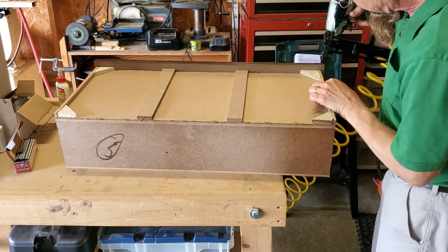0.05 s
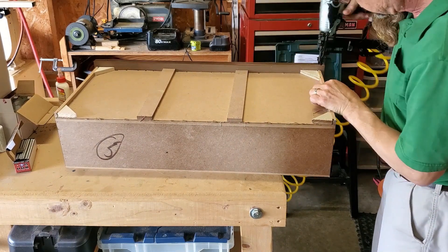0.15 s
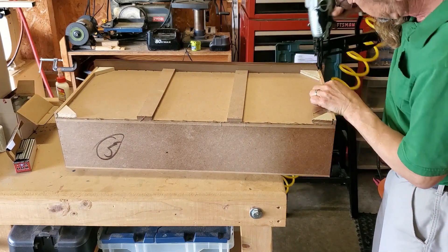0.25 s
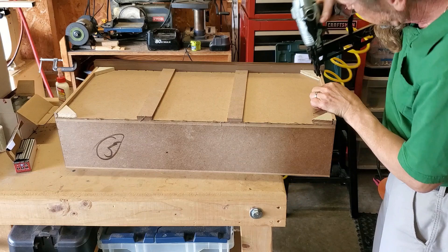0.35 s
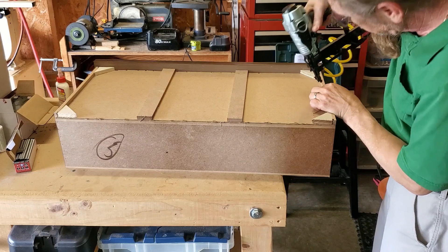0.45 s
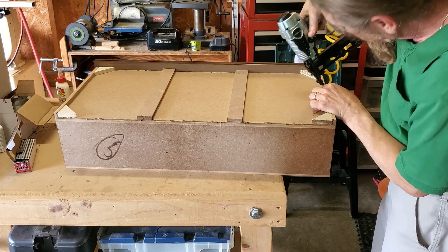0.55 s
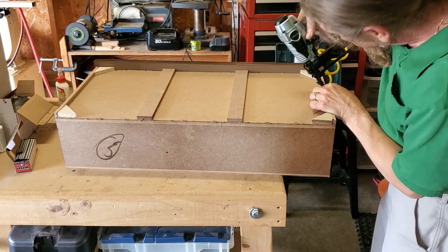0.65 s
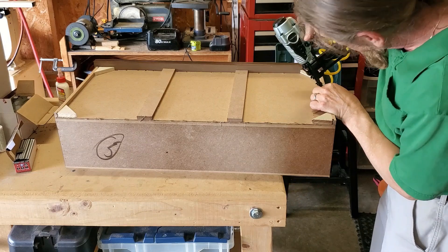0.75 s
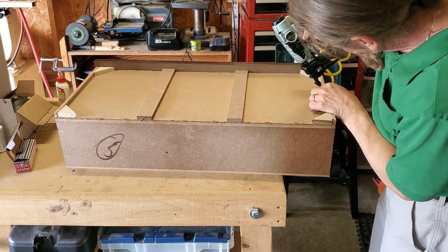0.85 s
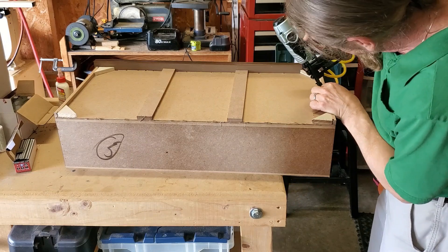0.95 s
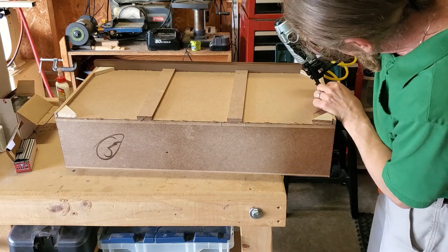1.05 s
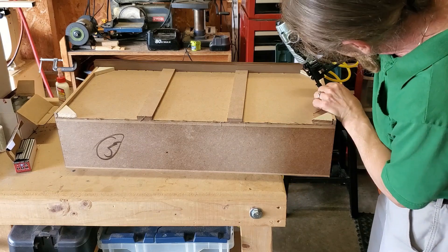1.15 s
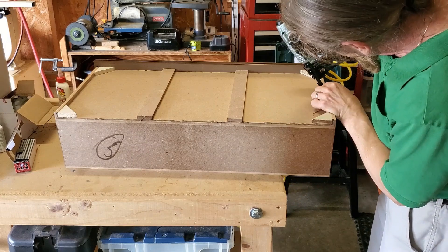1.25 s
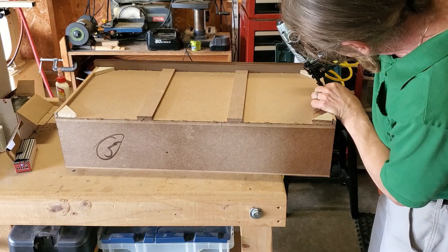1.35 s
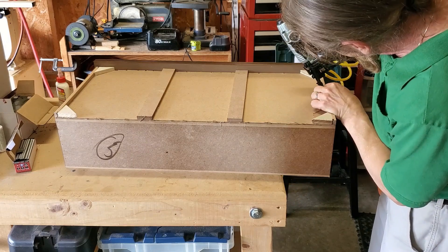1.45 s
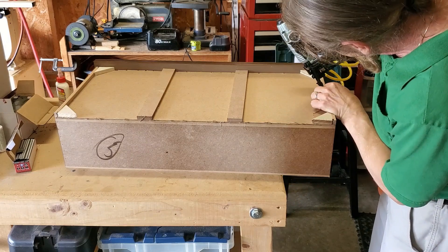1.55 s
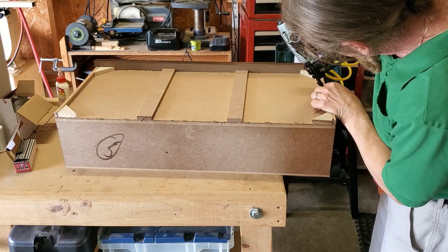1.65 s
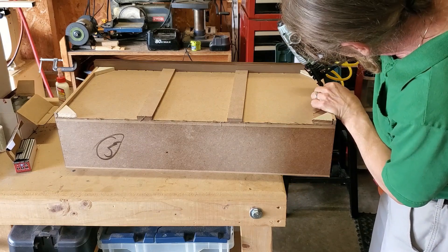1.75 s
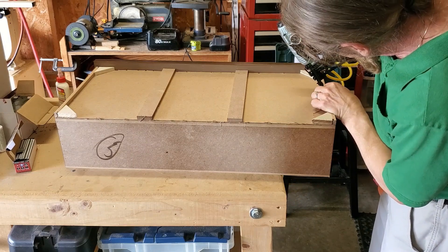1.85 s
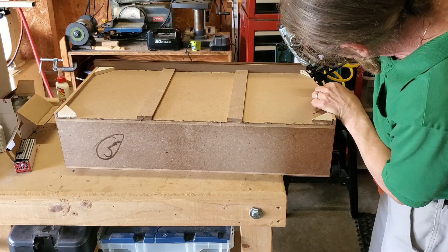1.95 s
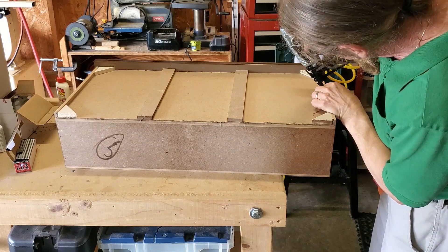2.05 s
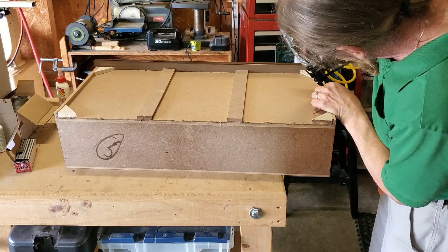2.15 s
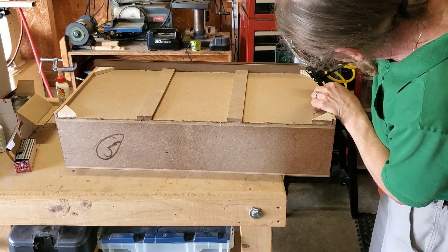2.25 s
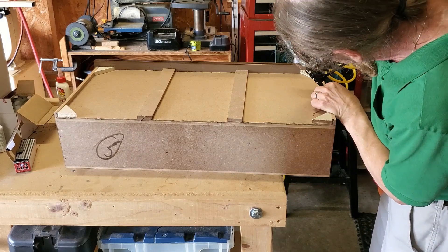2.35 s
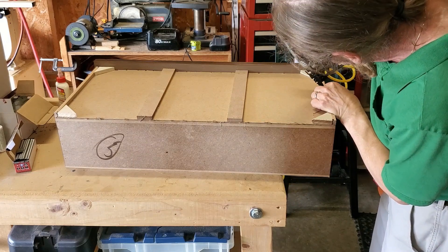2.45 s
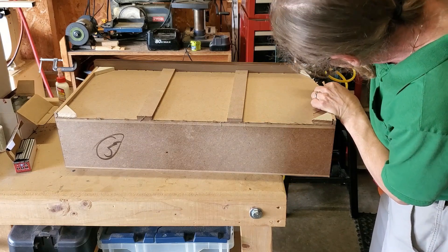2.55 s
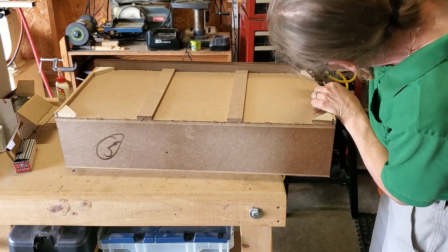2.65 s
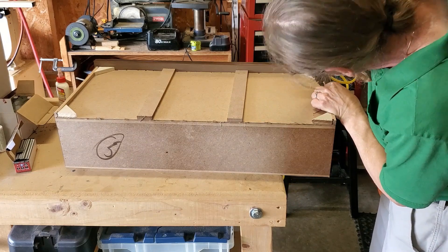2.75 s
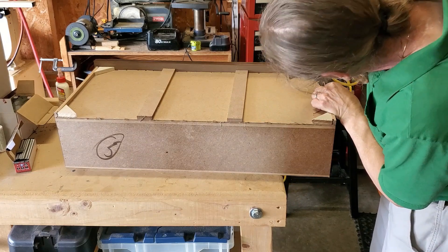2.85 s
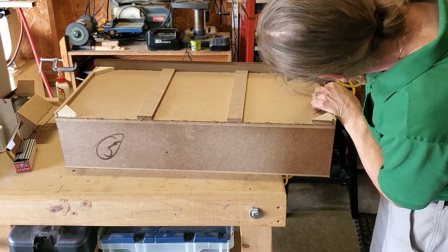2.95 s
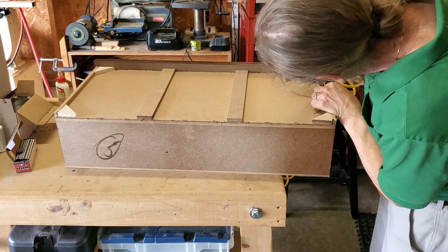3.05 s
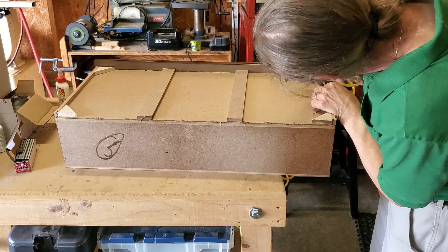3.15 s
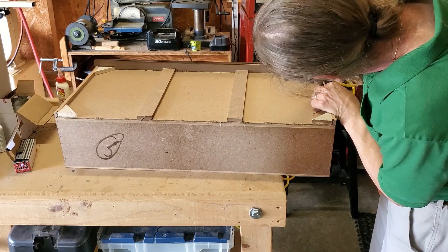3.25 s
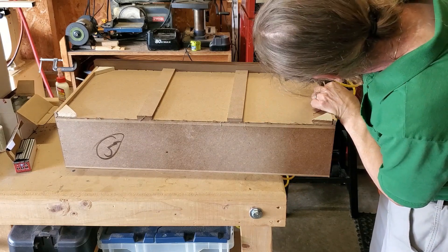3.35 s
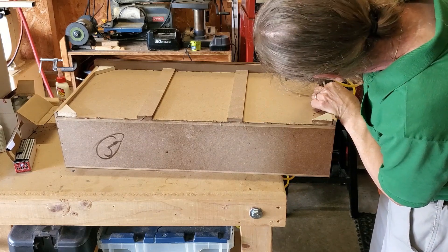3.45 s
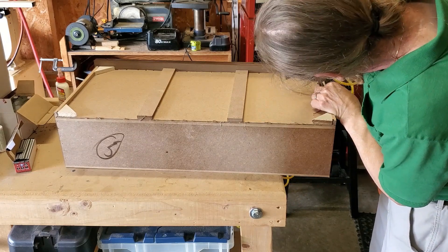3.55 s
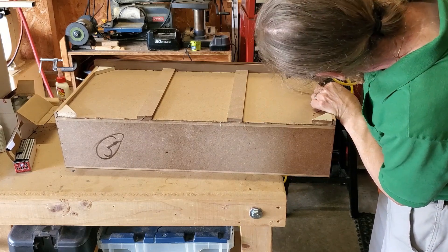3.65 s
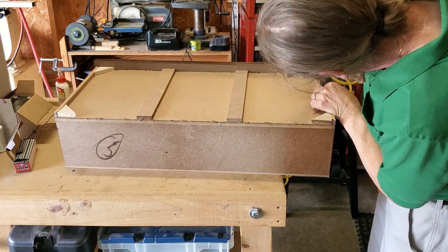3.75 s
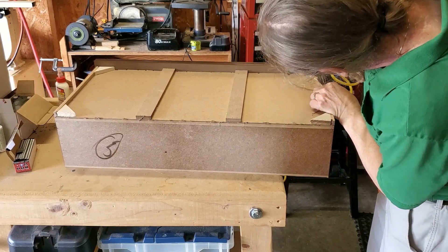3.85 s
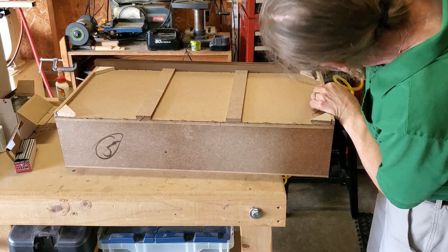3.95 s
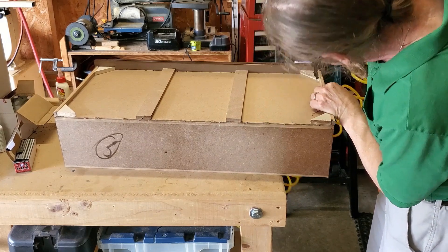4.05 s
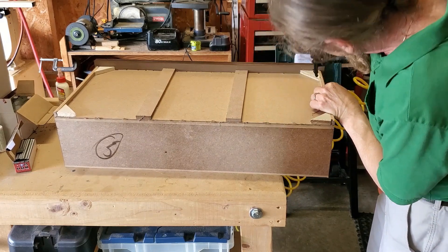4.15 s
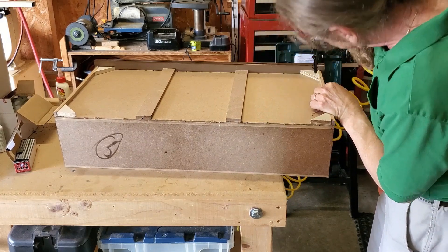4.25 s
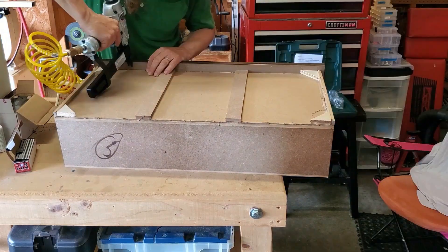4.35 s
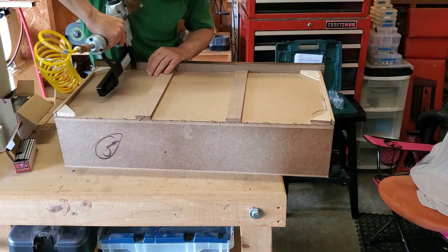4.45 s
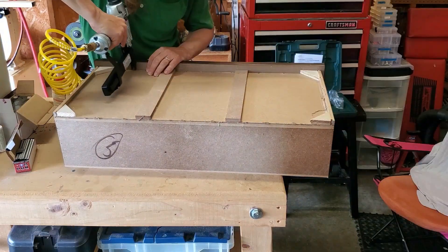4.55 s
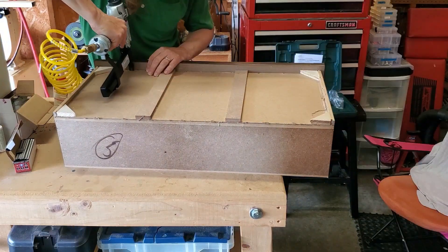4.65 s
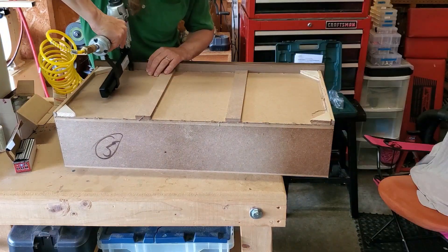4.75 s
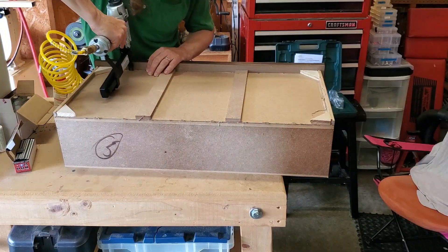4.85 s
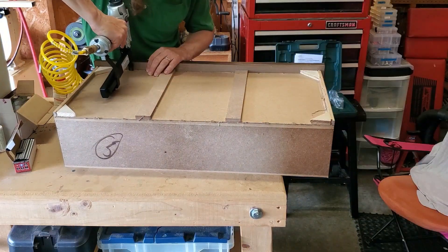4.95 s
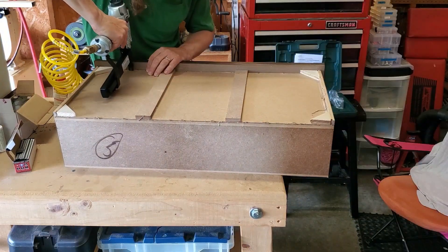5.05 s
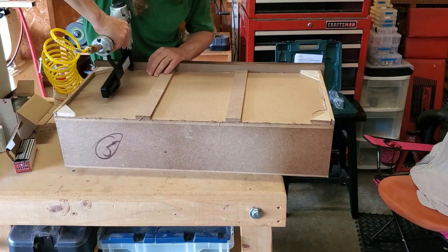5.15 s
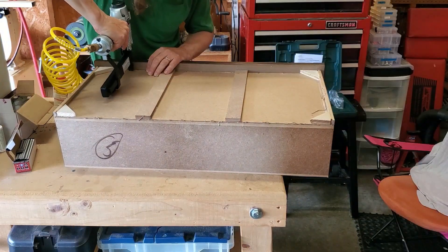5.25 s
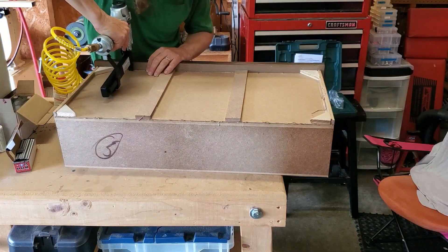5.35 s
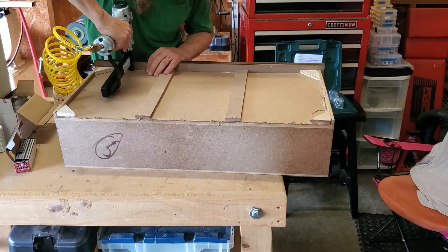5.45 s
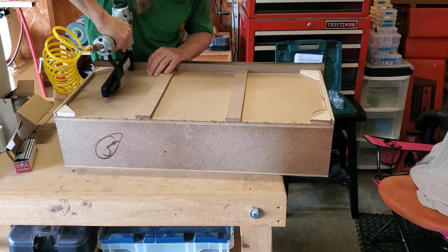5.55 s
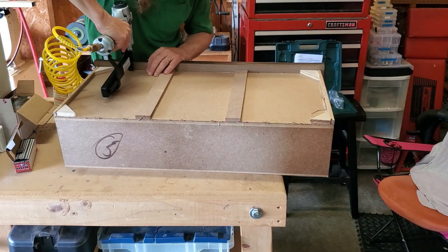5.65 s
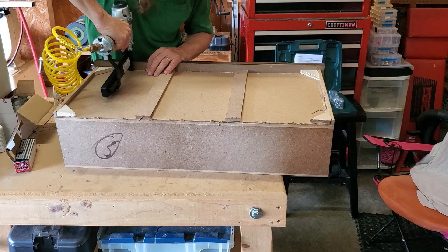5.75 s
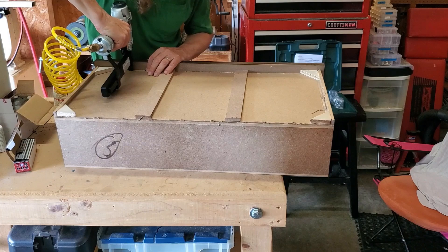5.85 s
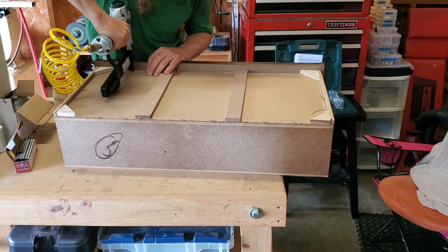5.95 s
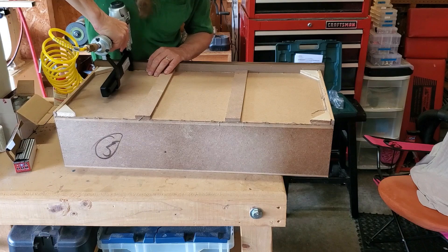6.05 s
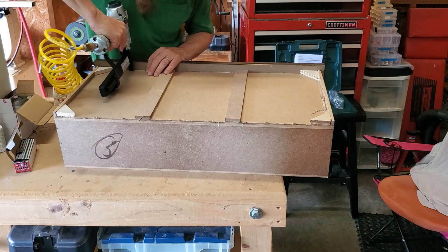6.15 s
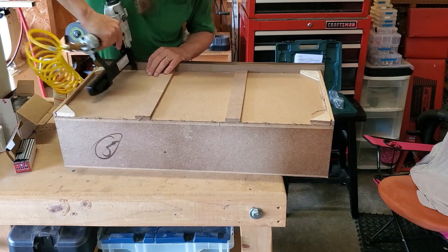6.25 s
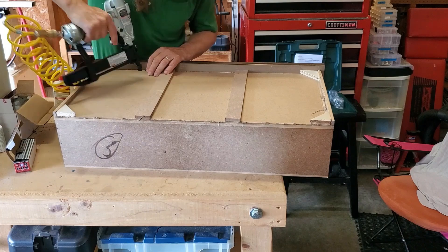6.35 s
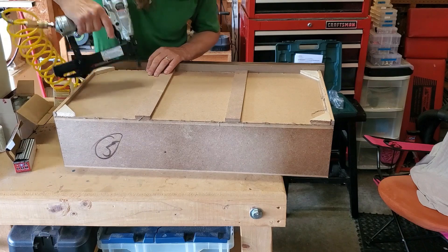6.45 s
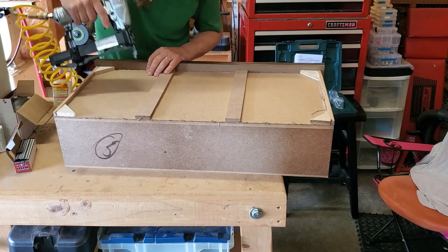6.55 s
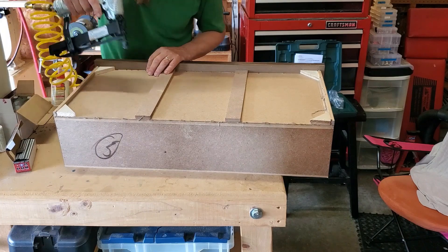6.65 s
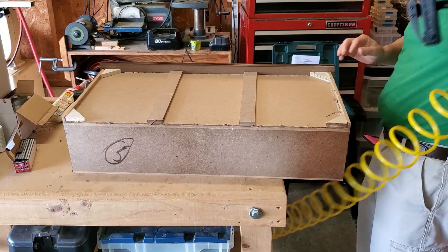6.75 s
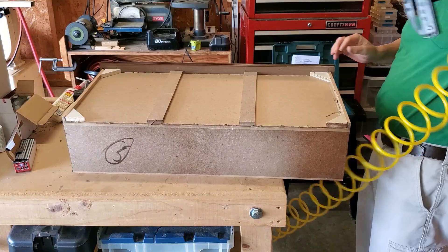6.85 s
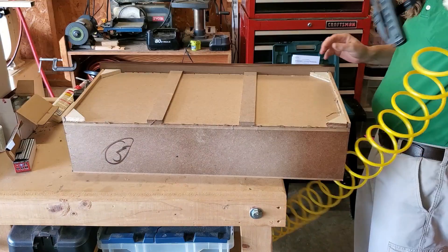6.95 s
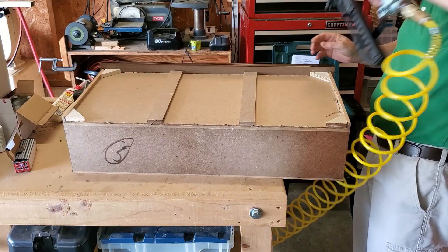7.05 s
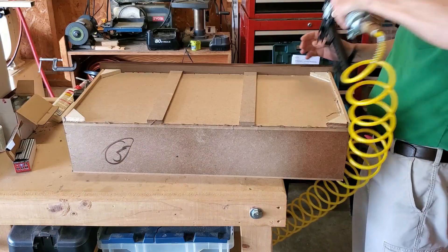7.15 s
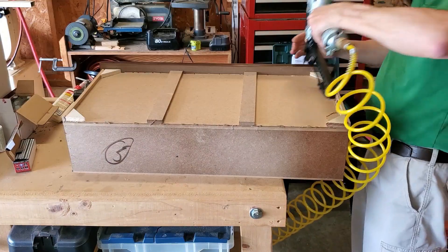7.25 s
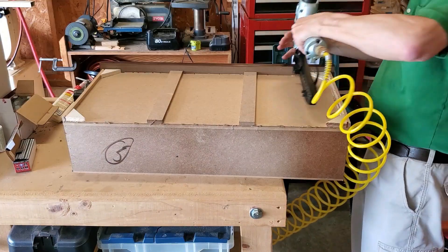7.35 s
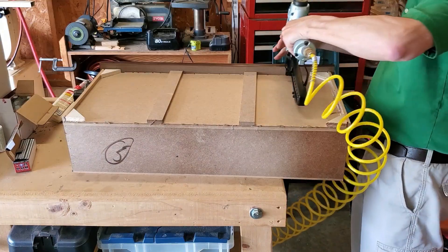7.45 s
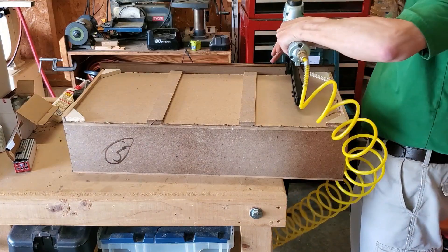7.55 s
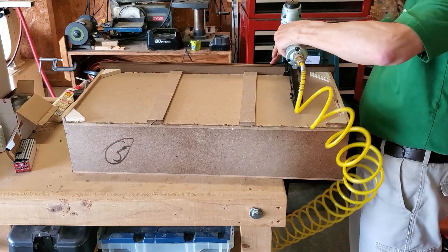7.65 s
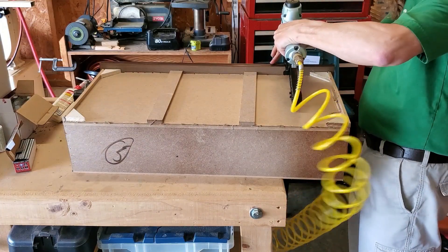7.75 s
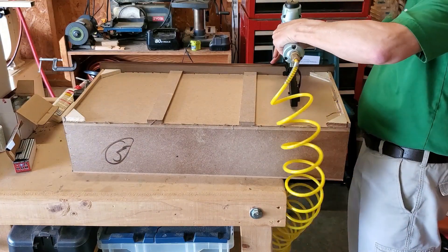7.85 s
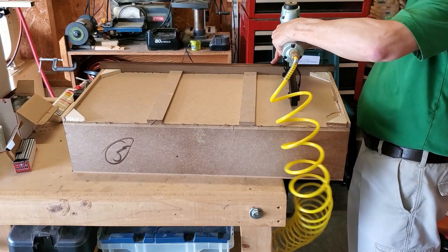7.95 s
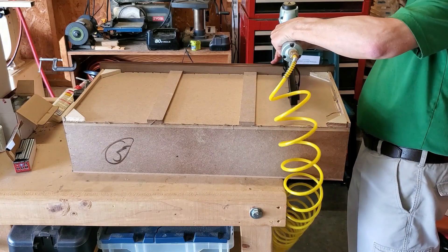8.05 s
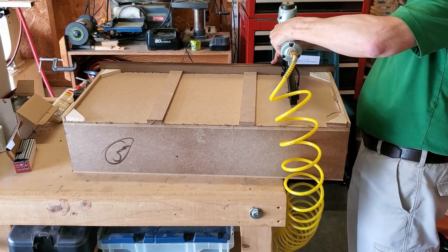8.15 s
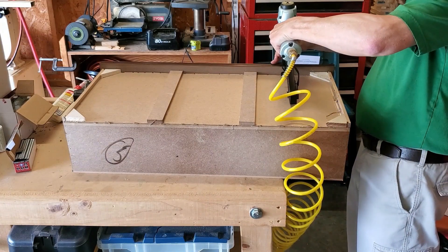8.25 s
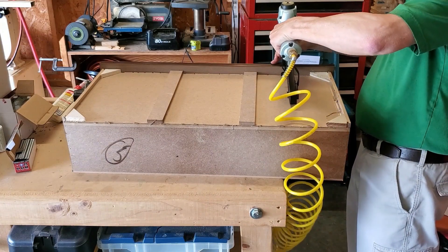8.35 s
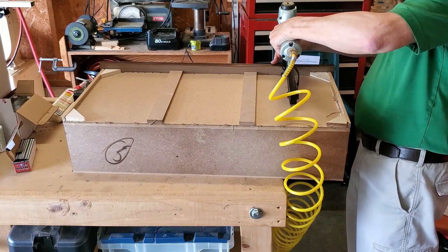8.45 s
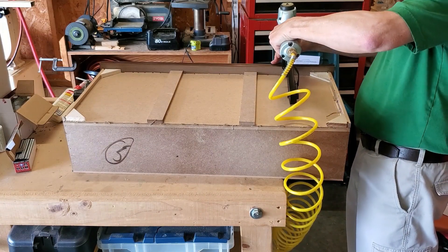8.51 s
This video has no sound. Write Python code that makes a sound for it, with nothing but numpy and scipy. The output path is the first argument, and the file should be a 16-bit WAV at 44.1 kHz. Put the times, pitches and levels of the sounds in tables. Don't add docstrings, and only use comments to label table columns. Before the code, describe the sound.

Faint handling knocks, a sharp staple-gun bang with popping air exhaust, more bumps, a second bang, then hard hollow clatter in a live workshop.

```python
import sys
import numpy as np
from scipy import signal
from scipy.fft import rfft, irfft
from scipy.io import wavfile
from scipy.ndimage import uniform_filter1d

SR = 44100
rng = np.random.default_rng(int(sys.argv[2]) if len(sys.argv) > 2 else 0)


def wav_record(signal):
    frames = np.transpose(np.atleast_2d(signal))
    bounded = np.clip(frames, -1, 1)
    quanta = np.round(bounded * 32767).astype(np.int16)
    wavfile.write(sys.argv[1], SR, quanta)


def invert_db(x):
    u = np.asarray(x, float) / 20
    return 10 ** u


N = 378378

# [t/s, kick level/dB, push width/ms, valve leak level/dB, air rush level/dB]
SHOTS = [
    (3.4717, -1, 0.09, -42.5, -9),
    (5.928, -2, 0.13, -28.5, -15.5),
]
# [f/Hz, density/dB per Hz]
RUSH_COLOURS = [
    [(35, -36), (60, -5), (124, -25.5), (229, -3.5), (264, -12.5), (546, -5), (961, -14.5), (2090, -11.5),
     (2350, -16), (14700, -26.5), (16500, -36.5)],
    [(35, -41), (60, -24.5), (108, -48.5), (173, 0.5), (573, -1.5), (1650, -0.5), (6760, -12.5),
     (7420, -20.5), (13700, -12), (15400, -16.5), (16500, -54.5)],
]
RUSH_S_PER_MS = 0.28
# [t/s, level/dB, width/ms]
SLAPS = [
    (3.4788, -6, 0.08),
    (3.4876, -3, 0.05),
    (3.4955, -7, 0.2),
    (3.6963, -12, 0.05),
    (5.9697, -6, 0.07),
    (6.1355, -8, 0.08),
]
# [t/s, port pop level/dB, hiss level/dB, hiss t60/s, piston thud level/dB]
EXHAUSTS = [
    (3.665, -8, -18, 0.34, -15),
    (6.1011, -24, -21.5, 0.28, -13.5),
]
# [f/Hz, density/dB per Hz]
AIR_COLOUR = [(180, -35), (300, -1), (361, -6.5), (793, -4), (1130, -9), (2840, -10.5), (6900, -10),
              (7760, -13.5), (15200, -9), (16500, -17)]
POP_HZ, POP_RISE_S, POP_T60_S = 2400, 0.0004, 0.0028
HISS_DELAY_S = 0.0033

# [t/s, tool clack level/dB, box thud level/dB, panel knock level/dB]
KNOCKS = [(0.3495, -67, -54, -83), (0.449, -68, -52, -74), (0.7795, -55.5, -52.5, -48),
          (1.06, -49, -47.5, -50), (2.0813, -43, -46, -77), (2.7038, -73, -53, -90),
          (4.6832, -45.5, -34.5, -60), (5.285, -40, -25.5, -41.5), (6.76, -29.5, -32, -34),
          (6.8949, -70, -43, -29.5), (6.9995, -18.5, -47, -17.5), (7.205, -50, -42, -32.5),
          (7.2635, -39.5, -33.5, -25), (7.6014, -29, -30, -26), (7.7443, -59, -34, -21.5),
          (7.9148, -22, -19, -14.5)]
# [t/s, tool clack level/dB, box thud level/dB, panel knock level/dB]
CLICKS = [(0.706, -50, -68, -88), (1.2908, -33.5, -55, -32), (1.3913, -35.5, -41, -57),
          (1.8323, -58, -42, -66), (4.3505, -47, -22, -36.5), (4.4043, -47.5, -41, -62),
          (4.5171, -36, -27.5, -39.5), (4.6171, -48.5, -55, -41.5), (5.2941, -46, -36.5, -50.5),
          (8.107, -29.5, -27, -27), (8.1354, -57, -27.5, -18), (8.302, -42.5, -46.5, -59),
          (8.3253, -69, -29, -41), (8.3606, -61, -45, -66), (8.502, -82, -33, -50)]
# [t/s, box level/dB, panel level/dB, contact length/ms]
THUDS = [(0.601, -59, -66, 9.7), (1.739, -50, -80, 8.5), (2.039, -38, -68, 8.9), (4.731, -38, -68, 5.3),
         (4.788, -26.5, -70, 1.7), (4.829, -43, -71, 9.9), (4.957, -30, -78, 2.4), (5.139, -31.5, -55, 6.9),
         (5.178, -47, -68, 11), (5.347, -33.5, -65, 2.1), (5.423, -34, -77, 2.8), (7.699, -35, -33.5, 11.4),
         (7.79, -34, -33, 8.7)]
# [f/Hz, width/Hz, level/dB]
BOX_MODES = [(138, 8.3, -8.5), (180, 75, 2.5), (235, 47, 2.5), (269, 19, -4)]
# [f/Hz, width/Hz, level/dB]
PANEL_MODES = [(383, 44, -1), (487, 16, -0.5), (556, 56, 0.5), (668, 153, 1.5), (856, 18, -4.5),
               (1080, 160, -3.5), (1313, 80, -4)]
# [f/Hz, width/Hz, level/dB]
TOOL_MODES = [(1590, 280, -4.5), (1820, 23, 10), (2098, 32, 5.5), (2975, 100, 17), (3390, 780, 10.5)]
KNOCK_TICK_DB, CLICK_TICK_DB = -22, 0
KNOCK_MS, CLICK_MS = 5.4, 3.1
KNOCK_RISE_S, CLICK_RISE_S = 0.0019, 0.00062
SOFTEN = 0.08
GRIP_DAMP = 1.9
DULL = 0.17

# [t/s, level/dB, f/Hz, t60/s]
THUMPS = [(2.075, -27, 125, 0.047), (2.7, -55.5, 180, 0.23), (4.354, -36.5, 179.3, 0.21),
          (4.683, -35, 180, 0.087), (4.79, -37, 258.6, 0.037), (5.139, -42, 249, 0.11),
          (5.287, -35, 172, 0.15), (5.42, -38.5, 208, 0.05), (7.001, -31, 174.5, 0.2),
          (7.262, -35, 188, 0.11), (7.744, -12, 250, 0.026), (7.914, -21.5, 240, 0.084),
          (8.131, -38, 231, 0.098)]
# [t/s, level/dB, f/Hz, t60/s]
BONKS = [
    (4.351, -37, 383, 0.073),
    (4.618, -43, 1470, 0.025),
    (7.003, -27, 900, 0.044),
    (7.002, -29, 1500, 0.045),
    (7.918, -27.5, 1800, 0.036),
    (8.302, -42.5, 4900, 0.037),
    (7.745, -26.5, 560, 0.031),
    (7.916, -15, 670, 0.031),
    (8.133, -25, 593, 0.074),
    (8.324, -32.5, 565, 0.02),
]

# [t/s, rumble level/dB]
LEAN = [
    [(0.3, -70.5), (1.14, -58.5), (1.95, -61.5), (2.23, -59.5), (3.07, -63.5), (3.46, -64)],
    [(4.345, -81), (4.553, -45), (4.927, -59.5), (5.415, -60), (5.589, -65.5), (5.91, -64.5)],
    [(6.75, -54.5), (6.958, -48), (7.514, -50), (7.778, -61), (8.33, -69), (8.58, -49)],
]
LEAN_RUB_DB = -9
# [peak t/s, level/dB, swell/s]
JOLTS = [(1.07, -61, 0.15), (1.29, -48.5, 0.047), (2.088, -34.5, .15), (2.69, -56, 0.082),
         (3.22, -55.5, 0.24), (3.459, -47.5, .2), (4.36, -38.5, 0.034), (4.72, -42.5, 0.17),
         (5.325, -40, 0.67), (5.55, -59.5, 0.61), (5.901, -60, 0.35), (6.86, -77, 0.13), (7.12, -47, 0.25),
         (7.74, -40, 0.36), (8.136, -40.5, 0.34), (8.33, -45, 0.69)]
# [peak t/s, rub level/dB, scrape level/dB, swell/s]
SLIDES = [(.42, -58, -95, 0.22), (.63, -59, -84, 0.5), (1.284, -50, -80, 0.034), (1.88, -60, -88, 0.73),
          (2.041, -43.5, -90, 0.2), (3.442, -68.5, -87.5, 0.46), (4.349, -47, -62, 0.0067),
          (5.16, -63, -86, 0.47), (5.24, -45.5, -84, 0.29), (6.752, -49.5, -37, 0.015),
          (7.59, -44.5, -57, 0.15), (7.69, -61, -38.5, 0.07), (7.866, -24, -24.5, 0.15)]
JOLT_T60_S, SLIDE_T60_S, SCRAPE_T60_S = 0.31, 0.15, 0.049
SETTLE_DB, SETTLE_RISE_S, SETTLE_T60_S = -10, 0.017, 0.21
WORK_HISS_DB, WORK_HISS_MID_DB = -89.5, -78.5

# [blow level/dB, piston return level/dB]
SHUDDERS = [
    (-37, -45),
    (-47, -37),
]
SHUDDER_T60_S = 0.57

# [f/Hz, t60/s, level/dB, left-right likeness 0-1]
ROOM_BANDS = [(64.8, 0.83, -1, 0.95), (121, 0.32, -3, 1), (250, .4, 1, 0.96), (500, .4, 1, 0.62),
              (887, 0.41, 0.5, 0.23), (1710, 0.37, 5.5, 0.17), (4155, 0.34, 4, 0.06),
              (7143, 0.26, 2.5, 0.36), (14100, 0.2, 0, 0.05)]
ROOM_DB, FIRST_WALL_S, BUILD_S = 2, 0.0016, 0.0054
# [start t/s, end t/s, left lag behind
PLACES = [
    (0, 4.345, 3),
    (4.345, 6.75, -5),
    (6.75, 9, 2),
]
PAN_DB, PAN_FROM_HZ = 2.5, 890
# [f/Hz, density/dB per Hz]
HUSH_COLOUR = [(18, -48.5), (30, -7), (66, -4.5), (179, -21.5), (295, -24), (569, -27), (632, -29),
               (702, -28), (1320, -34.5), (2290, -31.5), (16000, -43)]
HUSH_DB = -76.5
MIC_LIFT_DB, MIC_LIFT_HZ = -1.5, 12200
TOP_HZ = 15800


def shots():
    kicks, body = np.zeros(N), np.zeros(N)
    air = hiss(AIR_COLOUR)
    for (s, kick_db, width_ms, leak_db, rush_db), colour in zip(SHOTS, RUSH_COLOURS):
        blow = kick(s, width_ms)
        crack = air * fade(s - 0.0003, 0.0003, 0.019)
        kicks += invert_db(kick_db) * (blow + invert_db(-11.5) * crack)
        body += invert_db(-11.5) * ring(blow, BOX_MODES + PANEL_MODES, -29.0)
        length = RUSH_S_PER_MS * width_ms
        rush = hiss(colour) * flicker(400, 3.5) * fade(s + 0.004, length, 5 * length)
        body += 3 * invert_db(rush_db) * rush
        body += 3 * invert_db(leak_db) * air * fade(s - 0.016, 0.024, 0.054)
    kicks += sum(invert_db(db) * kick(s, ms) for s, db, ms in SLAPS)
    return kicks, body


def kick(s, width_ms):
    out, i = np.zeros(N), int(s * SR) - 200
    u = ((i + np.arange(1000)) / SR - s) / width_ms * 1000
    back = np.maximum(u - 1, 0) / 1.8
    out[i:i + len(u)] = np.exp(-u ** 2) - 0.76 * back * np.exp(1 - back)
    return out


def exhaust():
    t = np.arange(N) / SR
    pops, jet = np.zeros(N), np.zeros(N)
    air = hiss(AIR_COLOUR) * flicker(150, 0.67)
    for s, pop_db, hiss_db, t60, thud_db in EXHAUSTS:
        later = s + HISS_DELAY_S
        pops += 8 * invert_db(pop_db) * np.sin(2 * np.pi * POP_HZ * (t - s)) * fade(s, POP_RISE_S, POP_T60_S)
        first_spurt = 2.4 * fade(later, 0.00039, 0.024)
        jet += invert_db(hiss_db) * air * (fade(later, 0.0002, t60) + first_spurt)
        thud = np.sin(2 * np.pi * 350 * (t - later)) * fade(later - 0.001, 0.00069, 0.02)
        pops += invert_db(thud_db) * thud
    return pops, jet


def knocks():
    out, size = np.zeros(N + SR), int(0.4 * SR)
    t = np.arange(size) / SR
    slow = np.array([[1.0], [2.5], [1.6], [0.8]])
    soft = [(s, -120, box_db + 2.5, panel_db, -120, ms, 0.006) for s, box_db, panel_db, ms in THUDS]
    for s, *part_db, ms, rise in contacts() + soft:
        push = (1 - np.exp(-t / rise / slow)) * invert_db(-60 * t / (max(ms, 1.0) * 0.007 * slow))
        push *= 1 + 0.78 * np.exp(-t / (5 * rise) / slow)
        push += 0.051 * (1 - np.exp(-t / 0.0056)) * invert_db(-60 * t / 0.45) / slow
        grit = rng.standard_normal((4, size)) * push * invert_db(part_db)[:, None]
        gripped = [(f, w * GRIP_DAMP, db - 3) for f, w, db in TOOL_MODES]
        tool = ring(grit[0], shifted(gripped), 4.4)
        box = ring(grit[1], shifted(BOX_MODES), -5.5)
        panel = ring(grit[2], shifted(PANEL_MODES), -2.5)
        tick = band(grit[3], 3200, 12300)
        i = int(s * SR)
        out[i:i + size] += invert_db(-1.5) * tool + invert_db(18) * box + invert_db(11.5) * panel + tick
    return out[:N]


def contacts():
    kinds = [(KNOCKS, KNOCK_TICK_DB, KNOCK_MS, KNOCK_RISE_S), (CLICKS, CLICK_TICK_DB, CLICK_MS, CLICK_RISE_S)]
    rows = []
    for table, tick_db, ms, rise in kinds:
        for s, tool, box, panel in table:
            tick = tool + tick_db + DULL * (tool + 35)
            length_ms = ms * invert_db(-SOFTEN * (max(tool, box, panel) + 39))
            rows.append((s, tool, box, panel, tick, length_ms, rise))
    return rows


def shifted(modes):
    return [(f * (1 + 0.077 * rng.standard_normal()), w, db) for f, w, db in modes]


def thumps():
    out, t = np.zeros(N + SR), np.arange(SR // 4) / SR
    for s, db, hz, t60 in THUMPS + BONKS:
        i = int(s * SR)
        decay = invert_db(db + 4.0 - 60 * t / t60)
        out[i:i + len(t)] += decay * np.sin(2 * np.pi * hz * t) * (1 - np.exp(-t / 0.0012))
    return out[:N]


def rubbing():
    noise = rng.standard_normal((4, N))
    rumble = unit(band(noise[0], 41, 120)) * flicker(8.8, 0.5)
    rustle = unit(band(noise[3], 3200, 26000)) * flicker(38, 1.5)
    rub = unit(band(noise[1], 130, 750)) + 0.22 * unit(band(noise[2], 1200, 4500)) + 0.04 * rustle
    mid_hiss = unit(band(noise[2], 1500, 3900))

    lean = uniform_filter1d(gain(LEAN), size=300)
    busy = lean > 1e-6
    low = lean + sum(invert_db(db) * swell(s, rise, JOLT_T60_S) for s, db, rise in JOLTS)
    mid = invert_db(LEAN_RUB_DB) * lean
    mid += sum(invert_db(db) * swell(s, rise, SLIDE_T60_S) for s, db, _, rise in SLIDES)
    mid += sum(invert_db(max(row[1:4]) + SETTLE_DB) * fade(row[0], SETTLE_RISE_S, SETTLE_T60_S)
               for row in contacts())
    scrape = sum(invert_db(db) * swell(s, rise, SCRAPE_T60_S) for s, _, db, rise in SLIDES)

    friction = mid * rub * flicker(25, 0.92)
    friction += (invert_db(-6.0) * scrape + invert_db(WORK_HISS_DB) * busy) * rustle
    friction += invert_db(WORK_HISS_MID_DB) * busy * mid_hiss
    return low * rumble, friction


def shudder():
    shake = np.zeros(N)
    for (blow_db, back_db), shot, puff in zip(SHUDDERS, SHOTS, EXHAUSTS):
        shake += invert_db(blow_db) * fade(shot[0], 0.035, SHUDDER_T60_S)
        shake += invert_db(back_db) * fade(puff[0], 0.02, SHUDDER_T60_S * 0.89)
    return shake * unit(band(rng.standard_normal(N), 55, 220)) * flicker(8.8, 2.0)


def room(x):
    t = np.arange(int(0.7 * SR)) / SR
    late = np.maximum(t - FIRST_WALL_S, 0)
    sparse = invert_db(4.8 * rng.standard_normal(len(t)) * np.exp(-late / 0.009))
    build = sparse * (1 - np.exp(-late / BUILD_S))
    shared, own = rng.standard_normal(len(t)), rng.standard_normal((2, len(t)))
    echo = np.zeros((2, len(t)))
    for hz, t60, db, alike in ROOM_BANDS:
        walls = (np.sqrt(alike) * shared + np.sqrt(1 - alike) * own) * build
        echo += band(walls * invert_db(-60 * late / t60), hz / 2 ** 0.5, hz * 2 ** 0.5)
    spectrum, (hz, _, db, _) = rfft(echo), np.transpose(ROOM_BANDS)
    f = np.arange(spectrum.shape[1]) * SR / len(t) + 1
    even = invert_db(np.interp(np.log(f), np.log(hz), db))
    even /= np.sqrt(uniform_filter1d(np.mean(np.abs(spectrum) ** 2, axis=0), size=35))
    echo = irfft(spectrum * even, len(t)) * (late > 0) * (t < 0.6)
    echo *= invert_db(ROOM_DB) / np.sqrt(np.sum(echo ** 2) / 2)
    return signal.fftconvolve(x[None], echo, axes=1)[:, :len(x)]


def hush():
    own = np.array([hiss(HUSH_COLOUR), hiss(HUSH_COLOUR)])
    return invert_db(HUSH_DB) * (0.44 * own + hiss(HUSH_COLOUR))


def unit(x):
    return x / np.sqrt(np.mean(x ** 2))


def band(x, lo_hz, hi_hz):
    edges = [lo_hz, min(hi_hz, 0.45 * SR)]
    return signal.sosfilt(signal.butter(2, edges, "band", fs=SR, output="sos"), x)


def hiss(colour):
    hz, db = np.transpose(colour)
    f = np.log(np.arange(N // 2 + 1) * SR / N + 1)
    shape = invert_db(np.interp(f, np.log(hz), db))
    return unit(irfft(rfft(rng.standard_normal(N)) * shape, N))


def ring(x, modes, broad_db):
    hz = np.array(modes)[:, 0]
    out = invert_db(broad_db) * band(x, hz.min() * 0.67, hz.max() * 1.126)
    for k, (f, w, db) in enumerate(modes):
        out += (-1) ** k * invert_db(db) * signal.lfilter(*signal.iirpeak(f, f / w, SR), x)
    return out


def fade(s, rise, t60):
    out, i = np.zeros(N), int(s * SR)
    t = np.arange(min(int((1.5 * t60 + 3 * rise) * SR), N - i)) / SR
    out[i:i + len(t)] = (1 - np.exp(-t / rise)) * invert_db(-60 * t / t60)
    return out


def swell(s, rise, t60):
    out = np.zeros(N)
    i, j = max(int((s - rise) * SR), 0), min(int((s + t60) * SR), N)
    t = np.arange(i, j) / SR - s
    out[i:j] = invert_db(np.where(t < 0, 60 * t / rise, -60 * t / t60))
    return out


def flicker(rate, db):
    k = int(SR / rate)
    steps = np.repeat(rng.standard_normal(N // k + 1), k)
    return invert_db(db * 1.5 * uniform_filter1d(steps, k)[:N])


def gain(tables):
    t = np.arange(N) / SR
    return sum(invert_db(np.interp(t, *np.transpose(rows), -200, -200)) for rows in tables)


def scene():
    kicks, rush = shots()
    pops, jet = exhaust()
    taps = knocks() + thumps()
    rumble, rub = rubbing()
    steady = rush + jet + invert_db(-9.0) * rub
    direct = steady + taps + kicks + pops
    sent = steady + invert_db(-1.5) * taps + invert_db(-2.5) * (kicks + pops)
    out = np.zeros((2, N))
    for start, end, lag in PLACES:
        here = slice(int(start * SR), int(end * SR))
        ports = np.array([np.roll(direct, lag), direct])
        out[:, here] = ports[:, here] + room(sent[here])
    pan = invert_db(np.array([[PAN_DB], [-PAN_DB]]) / 2)
    lows = signal.sosfilt(signal.butter(1, PAN_FROM_HZ, fs=SR, output="sos"), out)
    return lows + (out - lows) * pan + invert_db(-2.0) * rumble + invert_db(9.5) * shudder() + hush()


def low_pass(x):
    return signal.sosfilt(signal.butter(12, 16980, fs=SR, output="sos"), x)


def record(dry):
    thin = signal.sosfilt(signal.butter(2, 45, "high", fs=SR, output="sos"), dry)
    thin = thin + invert_db(MIC_LIFT_DB) * band(thin, MIC_LIFT_HZ, 17500)
    soft = np.tanh(1.05 * thin) / 1.05
    mix = signal.sosfilt(signal.ellip(8, 0.2, 60, TOP_HZ, fs=SR, output="sos"), soft)
    return low_pass(mix)


dry = scene()
out = record(dry)
wav_record(out)
```